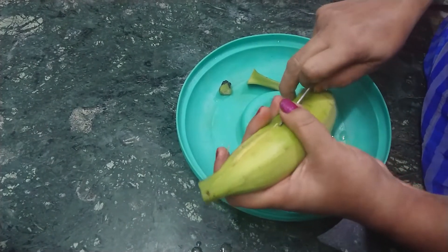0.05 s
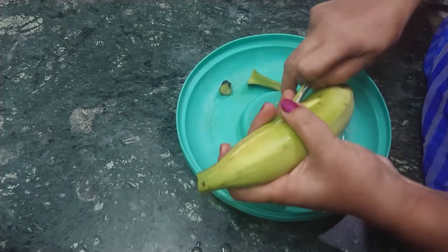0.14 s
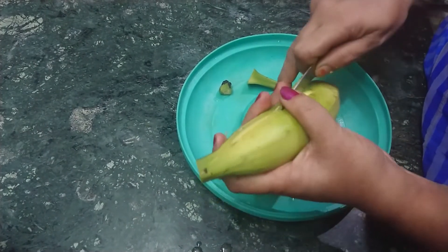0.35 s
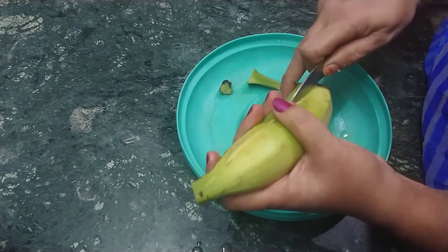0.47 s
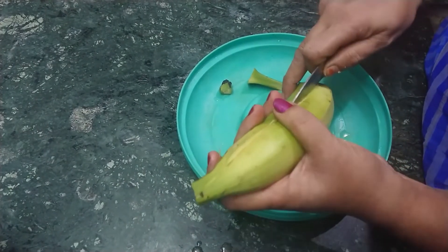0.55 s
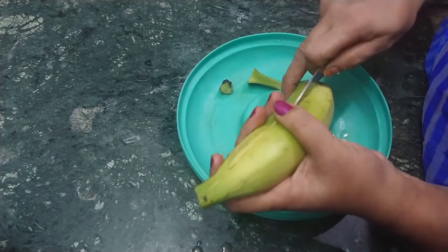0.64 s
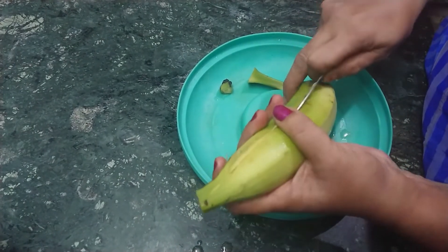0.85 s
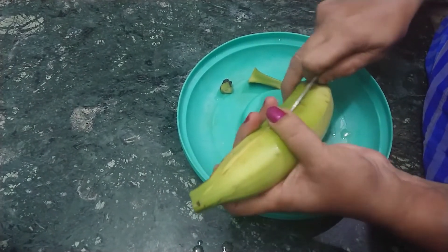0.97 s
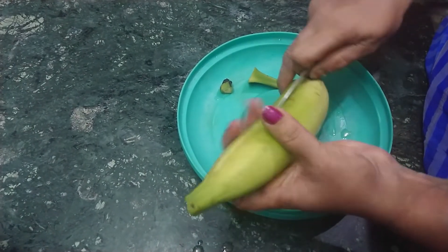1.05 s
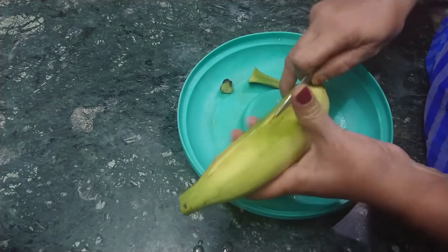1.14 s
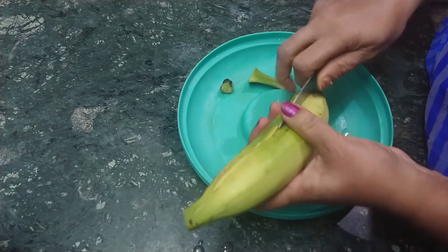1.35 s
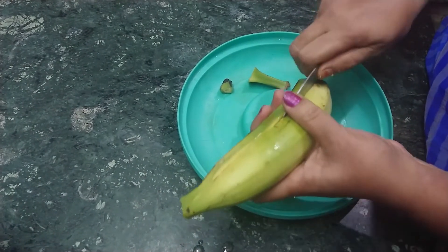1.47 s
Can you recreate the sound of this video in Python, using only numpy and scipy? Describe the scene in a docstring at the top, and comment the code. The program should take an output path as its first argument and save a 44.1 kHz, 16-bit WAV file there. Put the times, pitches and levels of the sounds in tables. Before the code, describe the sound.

Close knife cutting into raw banana peel: one crisp crunch, then light scrapes and ticks.

```python
"""A hard-walled kitchen, where a small knife works through the thick peel of a raw banana, close by.
Fibres tear in a swelling crunch until the peel cracks open and the freed blade rings.
Lighter scrapes follow: the edge rasps, the wet skin fizzes, the blade catches with short ticks.
The worktop and the room answer the strokes over a low steady hum."""
import sys
import numpy as np
from scipy import signal
from scipy.fft import rfft, irfft
from scipy.io import wavfile
from scipy.ndimage import uniform_filter1d

SR = 44100
rng = np.random.default_rng(int(sys.argv[2]) if len(sys.argv) > 2 else 0)


def materialize(psi):
    """Save the field psi as 16-bit PCM at rate SR to the path in sys.argv[1].

    A 1-D psi becomes a single channel; in a 2-D psi each row is a channel.
    """
    bounded = np.clip(np.atleast_2d(psi).T, -1, 1)
    quanta = np.round(bounded * 32767).astype(np.int16)
    wavfile.write(sys.argv[1], SR, quanta)


N = 66150
T = np.arange(N) / SR
FREQS = np.maximum(np.fft.rfftfreq(2 * N, 1 / SR), 1)
TOP_HZ = 15700
GRAINS_PER_S, GRAIN_SCATTER_DB = 4000, 3.5


def undb(db):
    return 10 ** (np.asarray(db) / 20)


def unit_rms(x):
    return x / np.sqrt(np.mean(x ** 2))


def unit_power(response):
    """Scale a response to mean power 1 below TOP_HZ."""
    return response / np.sqrt(np.mean(abs(response[..., FREQS < TOP_HZ]) ** 2))


def curve(points, column=1):
    """Interpolate a table column over log frequency."""
    table = np.array(points, float)
    return np.interp(np.log(FREQS), np.log(table[:, 0]), table[:, column])


def shape(x, response):
    """Filter by a frequency response."""
    return irfft(rfft(x, 2 * N) * response)[..., :N]


def causal(db):
    """Minimum-phase response with these gains: it rings only after a click."""
    cepstrum = irfft(np.log(undb(db)))
    cepstrum[..., 1:N] *= 2
    cepstrum[..., N + 1:] = 0
    return np.exp(rfft(cepstrum))


def sides(db):
    """Split a left-minus-right balance into left and right dB."""
    return np.array([[1], [-1]]) * db / 2


def resonance(hz, width_hz):
    """Steep band-pass that keeps the power of a click."""
    response = 1 / (1 + 1j * (FREQS / hz - hz / FREQS) * hz / width_hz) ** 2
    return response / np.sqrt(np.mean(abs(response) ** 2))


def colour(x, points):
    """Give clicks or noise a spectrum, keeping their power."""
    return shape(x, unit_power(causal(curve(points))))


def even(reflections, smooth_hz=90):
    """Spectrum of many reflections, levelled so that no pitch stands out."""
    response = rfft(reflections, 2 * N)
    power = uniform_filter1d(abs(response) ** 2, size=int(smooth_hz * 2 * N / SR), axis=-1)
    return response / np.sqrt(power)


def swell(peak_s, rise_s, fall_s, db):
    """Pressure grows and lets go; rise and fall each span 20 dB."""
    return undb(db - 20 * np.maximum((peak_s - T) / rise_s, (T - peak_s) / fall_s))


def crackle(per_s, scatter_db):
    """Random tiny breaks of uneven size."""
    breaks = (rng.random(N) < per_s / SR) * np.sign(rng.standard_normal(N))
    sizes = undb(scatter_db * np.clip(rng.standard_normal(N), -2, 2))
    return unit_rms(breaks * sizes)


def click(at_s):
    return 1. * (np.arange(N) == int(at_s * SR))


def worktop(x, decay_s=0.0023, plate_db=3, hands_db=-3):
    """Breaks arrive directly, scatter changingly off the hands and reflect off plate and worktop."""
    fade = np.exp(-T / decay_s)
    fade = fade / fade.sum()
    scatter_power = np.maximum(shape(x ** 2, rfft(fade, 2 * N)), 0)
    hands = np.sqrt(scatter_power) * rng.standard_normal((2, N))
    reflections = undb(plate_db) * np.sqrt(fade) * rng.standard_normal((2, N))
    plate = shape(x, even(click(0) + reflections))
    return (plate + undb(hands_db) * hands) / np.sqrt(1 + undb(hands_db) ** 2)


# Rumble and hiss spectrum. Each row: frequency in Hz, relative gain in dB.
AIR_SPECTRUM = [(20, -34), (38, -12), (50, -3), (62, 6.5), (85, -5.5), (130, 5), (175, 3), (250, -6.5),
                (400, -9), (650, -19.5), (1500, -21), (2700, -19.5), (6000, -34), (15000, -30.5)]
# Hum tones. Each row: frequency in Hz, level in dB.
HUM_TONES = [(62, -66), (102, -64.5)]
# Drift of rumble, hiss and hum. Each row: time in seconds, gain in dB.
BACKGROUND_DRIFT = [(0, -1), (.25, 0), (.78, 1), (1.1, -1), (1.28, -0.5), (1.5, -1)]


def background(air_db=-58, wide_hz=1200, drone_hz=274, drone_db=-62, hold_s=0.17, fall_db_per_s=19.5):
    """Low rumble and hum with faint hiss; a soft tone dies away."""
    def tone(hz):
        return np.sqrt(2) * np.sin(2 * np.pi * (hz * T + rng.random()))

    mid, side = (colour(rng.standard_normal(N), AIR_SPECTRUM) for _ in range(2))
    side = shape(side, np.clip(FREQS / wide_hz, .33, 1))
    air = undb(air_db) * np.array([mid + side, mid - side])
    hum = sum(undb(db) * tone(hz) for hz, db in HUM_TONES)
    drone = tone(drone_hz) * undb(drone_db - fall_db_per_s * np.maximum(T - hold_s, 0))
    drift = undb(np.interp(T, *np.array(BACKGROUND_DRIFT).T))
    return (air + hum) * drift + drone


# Light strokes. Each row: peak, rise and fall in seconds, level in dB, relative blade ring in dB.
STROKES = [(.004, 0.074, 0.1, -49, -8), (0.149, 0.039, 0.028, -52.5, -4), (.345, 0.086, 0.057, -37.5, -6.5),
           (0.525, 0.086, 0.061, -49.5, -4.5), (0.649, 0.066, 0.032, -60, -6),
           (0.841, 0.063, 0.041, -46.5, -4), (.888, 0.091, 0.061, -48.5, -2),
           (1.015, 0.015, 0.067, -43, -0.5), (0.734, 0.0072, 0.013, -62, -29), (1.286, 0.3, 0.12, -62.5, 2),
           (1.49, 0.09, 0.061, -68.5, -8.5)]
# Blade catches. Each row: start in seconds, level in dB, pitch in Hz.
CATCHES = [(0.025, -28.5, 3070), (0.7939, -25.5, 3040), (0.8115, -19.5, 3200), (0.8266, -21, 3080),
           (0.832, -23, 3000), (0.8448, -23, 3350), (0.8534, -21.5, 3240), (0.885, -26, 3200),
           (0.9116, -26, 3150), (1.0045, -21.5, 3200), (1.0147, -18, 3300), (1.026, -20, 3060),
           (1.2304, -17.5, 2845)]
# Rasp spectrum. Each row: frequency in Hz, relative gain in dB.
RASP_SPECTRUM = [(200, -12), (600, -11), (1100, -0.5), (1650, -4), (2400, 1.5), (4500, 0.5), (7000, 0.5),
                 (10000, -1.5), (13500, 5.5), (15500, -1)]


def scrapes(click_gain_db=-17):
    """The edge rasps through the skin; every catch of the blade adds a click."""
    pressure = sum(swell(peak_s, rise_s, fall_s, db) for peak_s, rise_s, fall_s, db, _ in STROKES)
    rasp = crackle(GRAINS_PER_S, GRAIN_SCATTER_DB) * pressure
    clicks = sum(undb(db + click_gain_db) * click(start_s) for start_s, db, _ in CATCHES)
    return colour(worktop(rasp + clicks), RASP_SPECTRUM)


# Tone of the damped blade. Each row: frequency in Hz, gain in dB.
BLADE_SPECTRUM = [(1200, -11.5), (2100, -5.5), (3100, -3.5), (5000, -7.5), (9000, -13.5)]


def blade(slip_s=0.00089, overtone_db=-6.5):
    """The blade, damped by the peel, rings briefly; each catch is a quick run of tiny slips."""
    push = sum(swell(*timing_s, db + ring_db) for *timing_s, db, ring_db in STROKES)
    ring = shape(crackle(GRAINS_PER_S, GRAIN_SCATTER_DB) * push, resonance(hz=3190, width_hz=1970))
    overtone = undb(overtone_db) * resonance(hz=4540, width_hz=1500)
    slips = rng.standard_normal(N)
    for start_s, db, hz in CATCHES:
        age = np.maximum(T - start_s, 0) / slip_s
        tick = shape(slips * age * np.exp(-age), resonance(hz, width_hz=790) + overtone)
        ring = ring + undb(db) * unit_rms(tick) / np.sqrt(N)
    return shape(ring, causal(curve(BLADE_SPECTRUM)))


# Wet skin parting. Each row: peak, rise and fall in seconds, level in dB.
FIZZ_SWELLS = [(.005, 0.046, 0.3, -54), (.188, 0.023, .04, -39), (.222, 0.018, 0.045, -34),
               (.345, 0.047, .05, -41.5), (.885, 0.04, 0.099, -54.5)]


def fizz():
    """Tiny wet cells burst in the top octave."""
    bursts = crackle(GRAINS_PER_S, GRAIN_SCATTER_DB) * sum(swell(*row) for row in FIZZ_SWELLS)
    return shape(worktop(bursts), resonance(hz=12650, width_hz=11000))


# Fine fibres tearing. Each row: peak, rise and fall in seconds, level in dB.
TEAR_SWELLS = [(0.186, 0.015, 0.022, -47), (0.202, 0.0045, 0.0073, -38.5), (0.229, 0.03, 0.03, -30),
               (0.239, .009, .018, -16.5), (0.247, 0.011, 0.016, -24), (0.269, 0.024, 0.035, -26.5)]
# Thick fibres snapping. Each row: start in seconds, level in dB.
FIBRE_SNAPS = [(0.1999, -15), (0.206, -8.5), (.2175, -7), (0.2314, 2), (0.2366, 3), (0.2392, -1),
               (.2420, -1.5), (0.2454, -4), (0.2514, -1.5)]
# Crunch spectrum. Each row: frequency in Hz, left and right relative gain in dB.
CUT_SPECTRUM = [(187, -32.5, -45.5), (379, -12.5, -7), (670, -25, -16), (1030, -11.5, -4.5),
                (1610, -11.5, -4.5), (2700, -8, 5), (3150, -15.5, -0.5), (4090, -1.5, 9), (4600, 0, -1),
                (5580, -6, 1.5), (6800, -5.5, -10), (7060, -15, -6.5), (8700, -18.5, 2.5), (9540, -15, -7),
                (11270, -10.5, -2), (12900, 5, -11.5), (15500, -10, -6)]


def deep_cut():
    """Fine fibres tear ever harder and thick ones snap; returns the close sound and the bare breaks."""
    tearing = crackle(per_s=9000, scatter_db=2.5) * sum(swell(*row) for row in TEAR_SWELLS)
    breaks = tearing + sum(undb(db) * click(start_s) for start_s, db in FIBRE_SNAPS)
    response = causal([curve(CUT_SPECTRUM, column=1), curve(CUT_SPECTRUM, column=2)])
    return shape(worktop(breaks), unit_power(response)), breaks


def free_blade(start_s=.2369, hz=4030, db=-26.5, t60_s=0.17):
    """The steel springs loose when the peel cracks and rings until the hand damps it."""
    age_s = np.maximum(T - start_s, 0)
    return undb(db - 60 * age_s / t60_s) * np.sin(2 * np.pi * hz * age_s)


# Room decay. Each row: band centre in Hz, time to fall 60 dB in seconds.
ROOM_DECAY = [(300, 0.71), (2500, 0.55), (5000, 0.57), (9000, 0.37), (15000, 0.15)]
# Wall reflections. Each row: frequency in Hz, left and right gain in dB.
WALL_SPECTRUM = [(252, -20, -12), (621, -21, -16), (844, -10.5, -4.5), (1360, -17, -7.5), (2410, -10, 6),
                 (3200, -12.5, -1.5), (4190, 2, 3), (6510, -6.5, -4.5), (9000, -12, -7.5),
                 (13460, -5.5, -12.5), (15500, -6.5, -27.5)]


def kitchen(x, onset_s=0.0071):
    """Hard walls return a diffuse tail whose treble dies first."""
    noise, tail = rng.standard_normal((2, N)), 0
    log_centres = np.log([hz for hz, _ in ROOM_DECAY])
    build_up = 1 - np.exp(-(T / onset_s) ** 2)
    for weights, (_, t60_s) in zip(np.eye(len(log_centres)), ROOM_DECAY):
        band = shape(noise, np.interp(np.log(FREQS), log_centres, weights))
        decay = unit_rms(undb(-60 * T / t60_s) * build_up) / np.sqrt(N)
        tail = tail + band * decay
    walls = causal([curve(WALL_SPECTRUM, column=1), curve(WALL_SPECTRUM, column=2)])
    return shape(x, even(tail) * walls)


# Stereo balance of the rasp. Each row: frequency in Hz, left minus right in dB.
RASP_BALANCE = [(400, -4), (2300, -13.5), (4500, 1.5), (6400, 2.5), (9200, -13), (11500, 1), (13700, 12.5),
                (15500, 7)]


def scene():
    """Knife and peel a little to the right, in the room."""
    cut, breaks = deep_cut()
    rasp, ring, sap = scrapes(), blade(), fizz()
    near = cut + shape(rasp, causal(sides(curve(RASP_BALANCE))))
    near += ring * undb(sides(-18.5))
    near += sap * undb(sides(1.5))
    near += free_blade() * undb(sides(-5))
    room = kitchen(undb(-2) * breaks + undb(1.5) * rasp[0] + undb(-4.5) * ring + undb(8.5) * sap[0])
    return near + room + background() * undb(sides(-6.5))


def record(dry):
    """A steep low-pass cuts the top."""
    return signal.sosfilt(signal.ellip(10, .2, 80, TOP_HZ, fs=SR, output="sos"), dry)


dry = scene()
out = record(dry)
materialize(out)
```